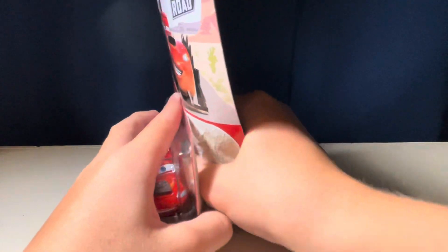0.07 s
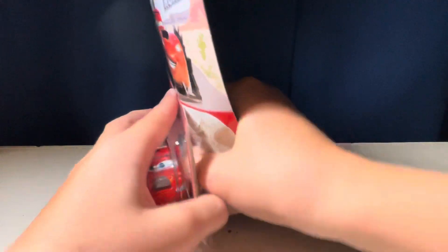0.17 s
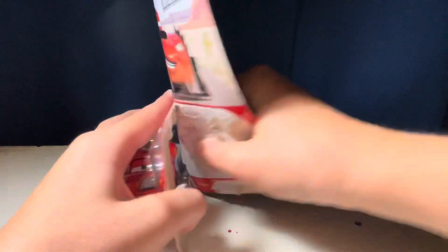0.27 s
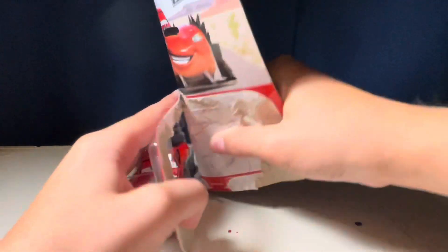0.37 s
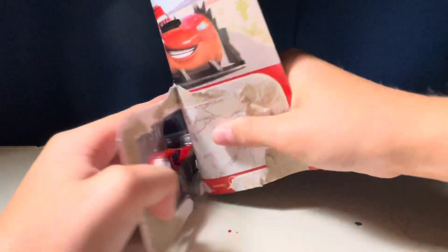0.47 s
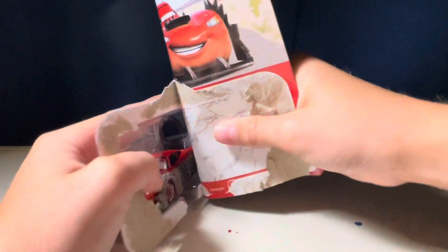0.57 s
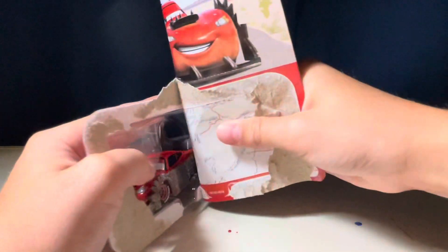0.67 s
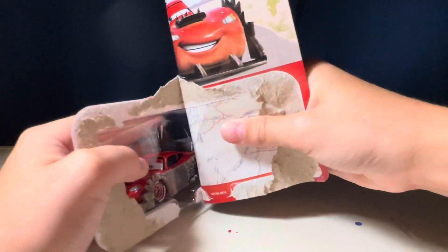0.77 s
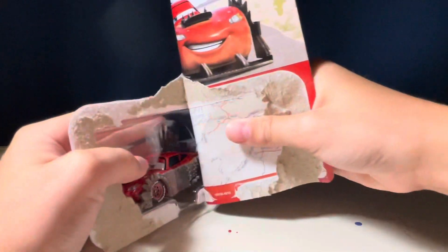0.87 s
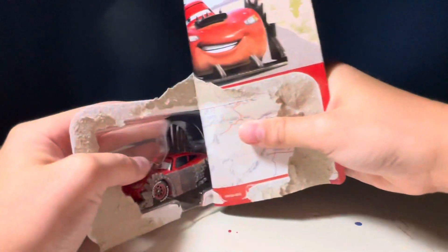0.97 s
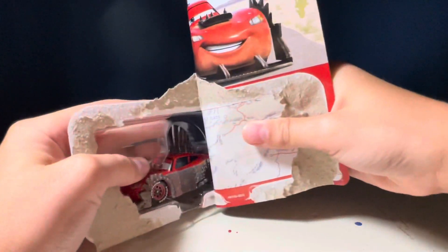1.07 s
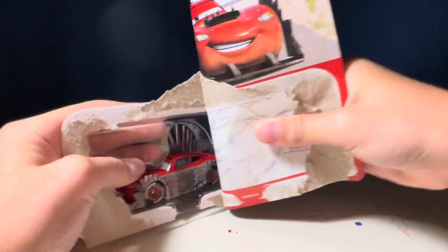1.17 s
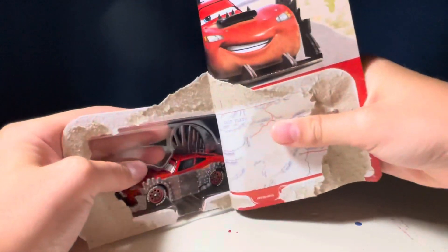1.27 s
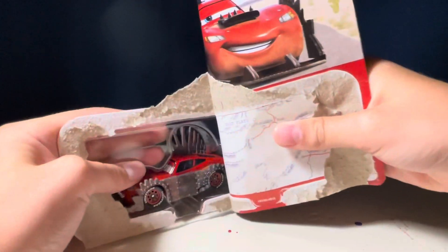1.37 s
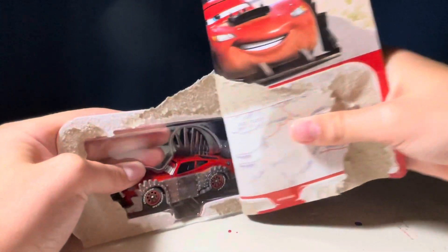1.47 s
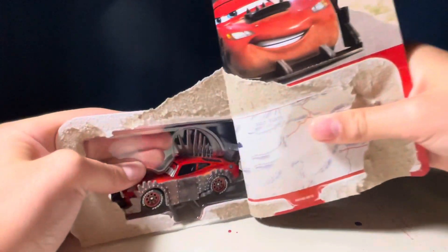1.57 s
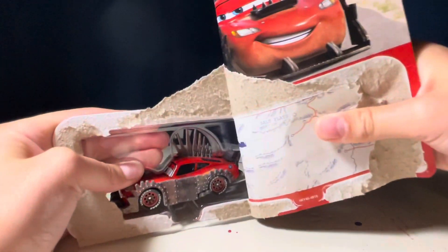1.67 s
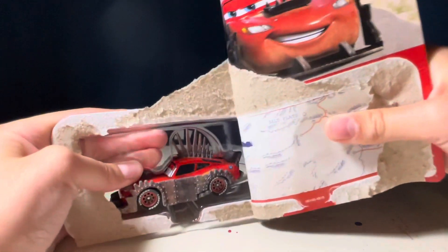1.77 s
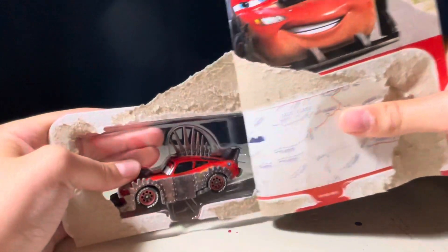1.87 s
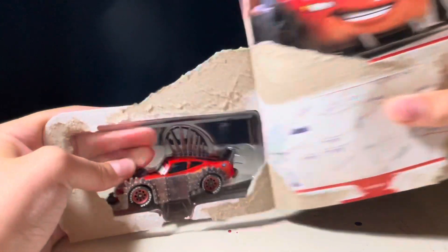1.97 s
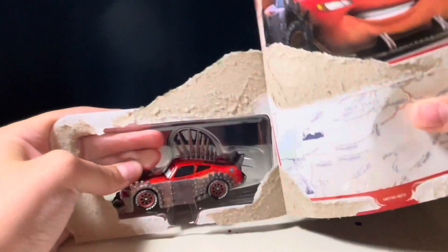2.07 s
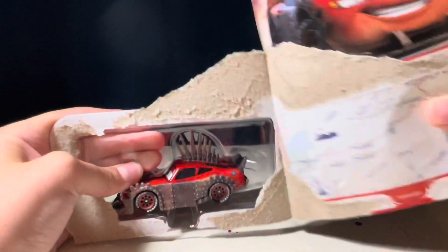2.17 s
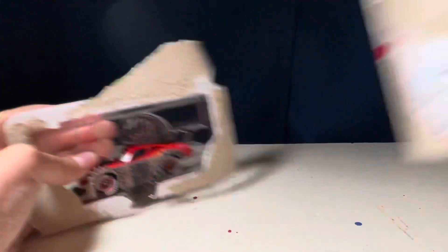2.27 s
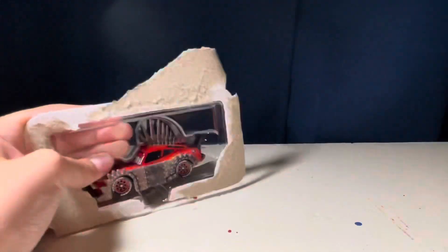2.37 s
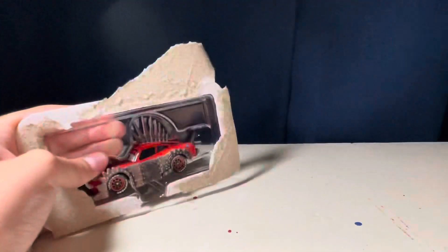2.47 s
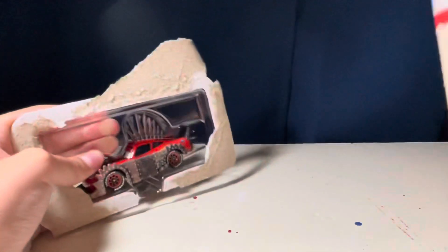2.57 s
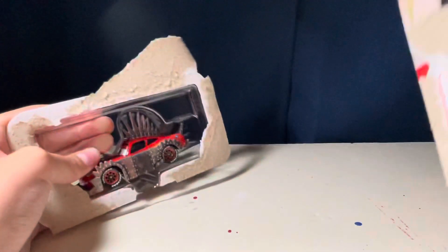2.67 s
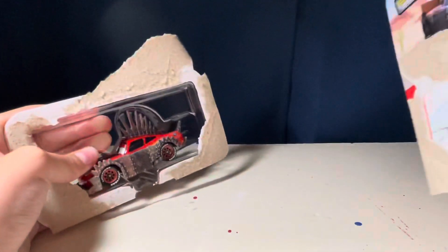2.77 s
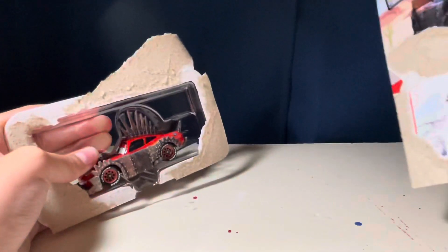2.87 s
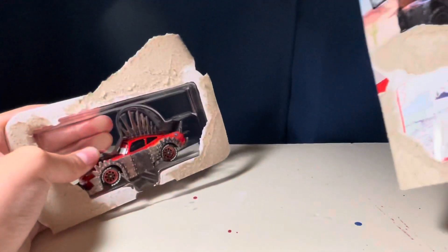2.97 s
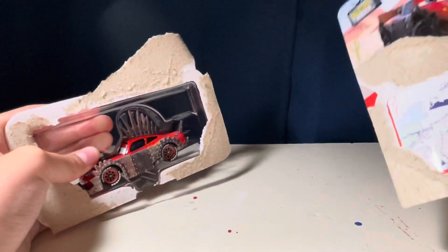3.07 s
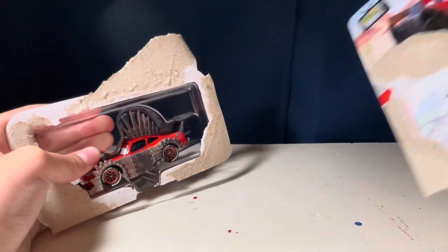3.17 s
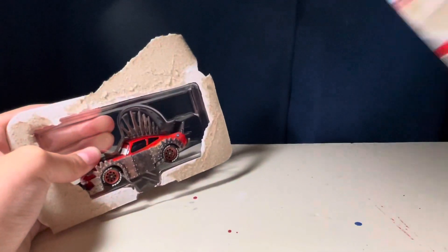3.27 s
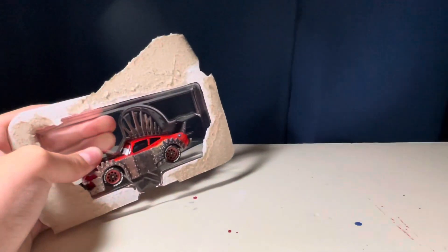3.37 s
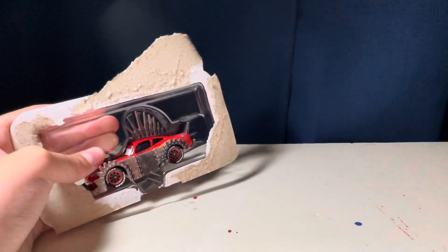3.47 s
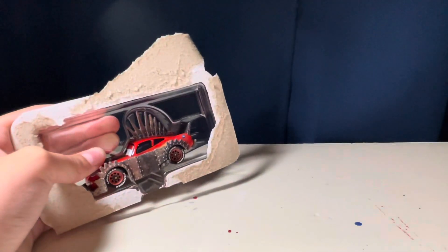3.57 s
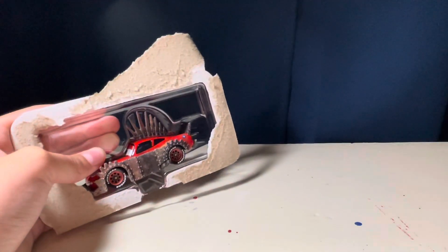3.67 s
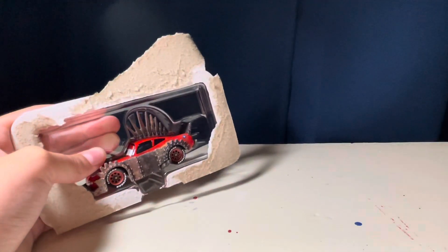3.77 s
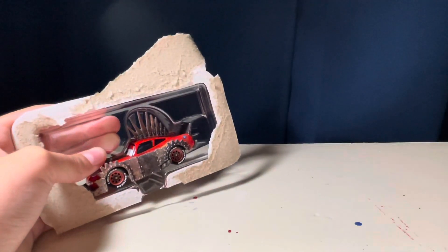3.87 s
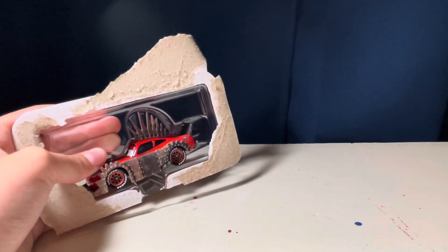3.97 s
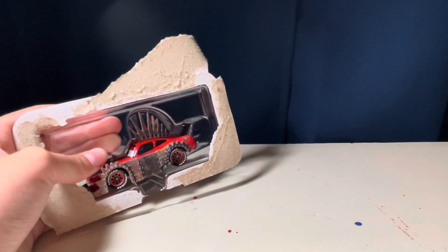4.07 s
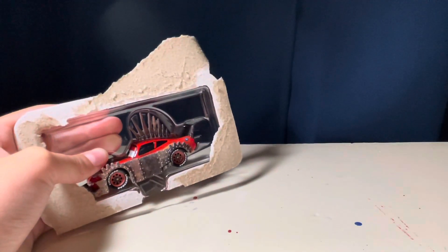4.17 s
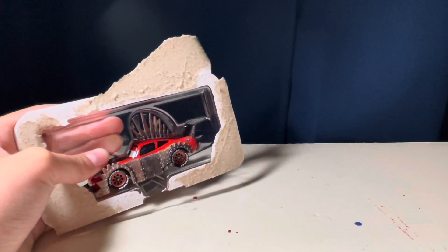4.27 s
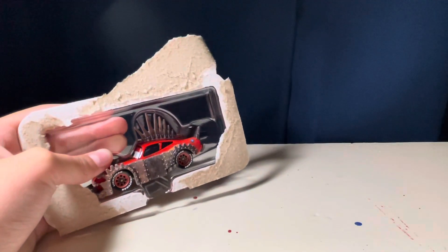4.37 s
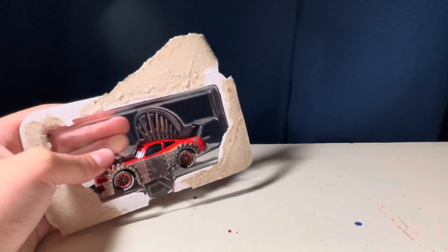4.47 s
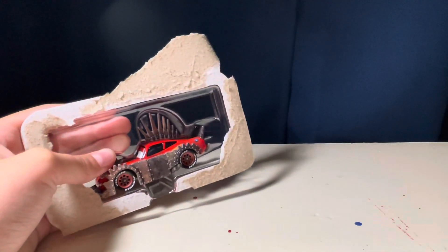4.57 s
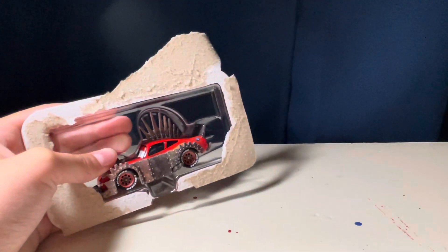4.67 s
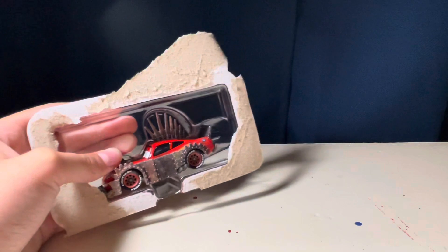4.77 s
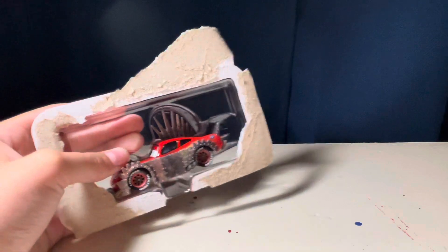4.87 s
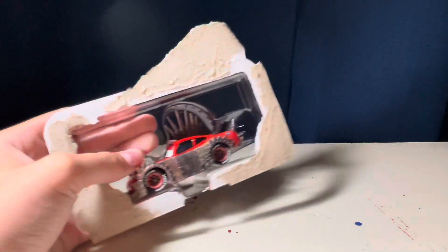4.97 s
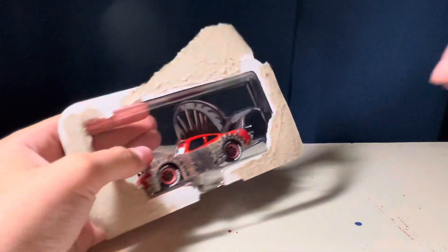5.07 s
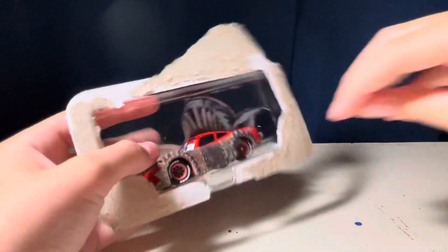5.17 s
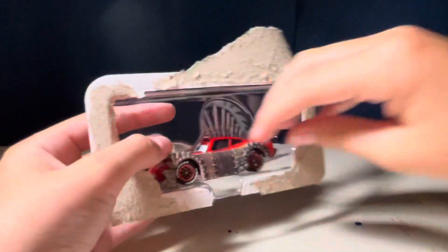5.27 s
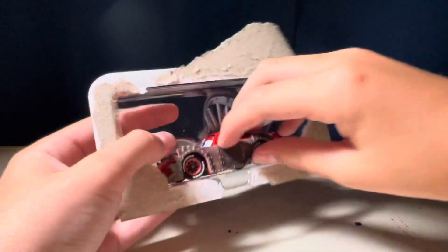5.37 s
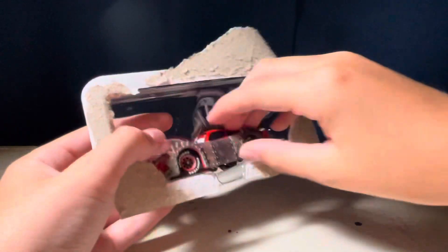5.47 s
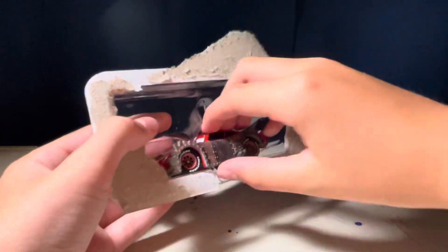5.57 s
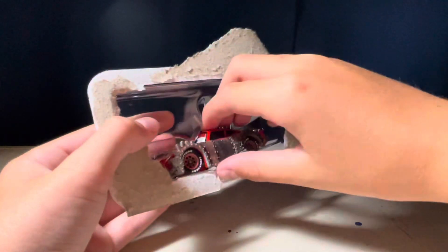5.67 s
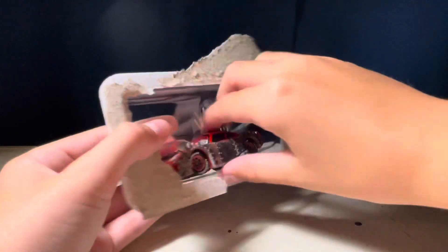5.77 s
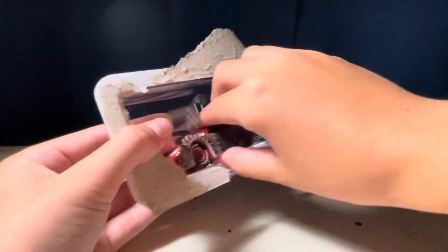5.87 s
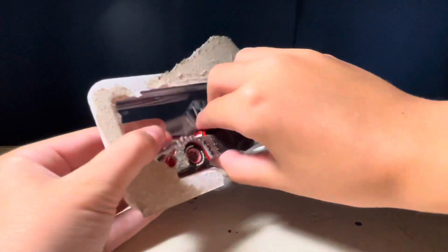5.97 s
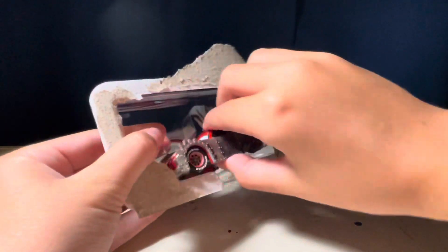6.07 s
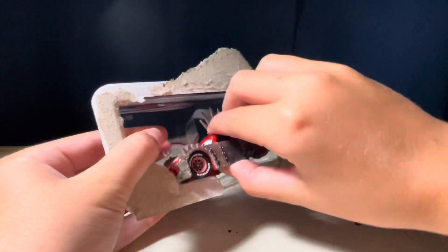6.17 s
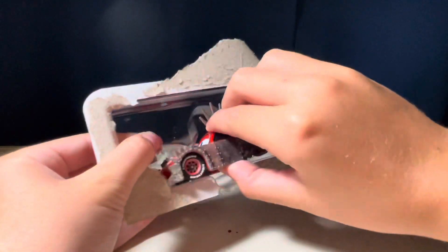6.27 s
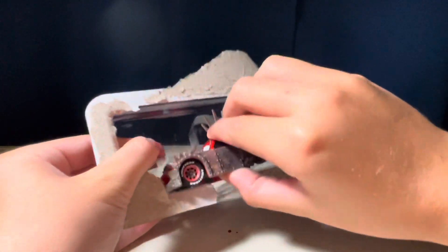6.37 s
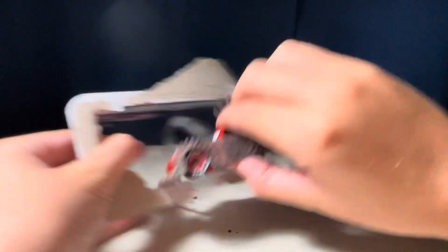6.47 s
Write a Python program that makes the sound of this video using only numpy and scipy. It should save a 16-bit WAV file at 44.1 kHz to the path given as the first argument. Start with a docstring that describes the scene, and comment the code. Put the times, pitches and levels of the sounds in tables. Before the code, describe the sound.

Close to a phone in a small room, hands peel cardboard from a plastic blister pack. Fibres snap in a dense, drumming tear with sharp jerks, juddering and a loud thump as it rips free. The loose card rustles faintly away to the right and taps the table. After a pause, fingers rub and crinkle the shell, which pops, creaks and finally cracks and squeaks as the toy is pulled. Faint air and hum behind.

```python
"""A table in a small room: hands peel the cardboard back off a toy's blister pack, close to a phone.
Fibres snap in a dense stream of noise grains that drums on the card until it rips free.
The card slides aside to the right; fingers rub and crinkle the plastic shell with filtered grains,
short bursts and ringing modes, and it pops and squeaks as the toy is pulled out. Faint air and hum lie behind."""
import sys
import numpy as np
from scipy import signal
from scipy.fft import rfft, irfft, next_fast_len
from scipy.io import wavfile
from scipy.ndimage import uniform_filter1d

SR = 44100
rng = np.random.default_rng(int(sys.argv[2]) if len(sys.argv) > 2 else 0)


def materialize(psi):
    """Save the field psi as 16-bit PCM at rate SR to the path in sys.argv[1].

    A 1-D psi becomes a single channel; in a 2-D psi each row is a channel.
    """
    bounded = np.clip(np.atleast_2d(psi).T, -1, 1)
    quanta = np.round(bounded * 32767).astype(np.int16)
    wavfile.write(sys.argv[1], SR, quanta)


N = 287961
T = np.arange(N) / SR
PADDED = next_fast_len(N + 4096, True)  # room for filtering the whole scene at once
HZ = np.fft.rfftfreq(PADDED, 1 / SR)

# tone colour of fibres fizzing at the tear: frequency_hz, gain_db
FIBRE_COLOUR = [(1200, -11), (3200, 0.5), (4500, -2.5), (6500, -2), (8000, -8), (9500, -0.5), (12500, -1.5),
                (14500, -10.5), (16000, -26.5)]
# tone colour of a single strand knocking the flap: frequency_hz, gain_db
STRAND_COLOUR = [(150, -14), (500, -5), (900, 1.5), (1400, -4.5), (2200, -20), (4000, -24)]
# tone colour of a crease in the card giving way: frequency_hz, gain_db
CREASE_COLOUR = [(200, -0.5), (720, -5), (1050, 2.5), (2100, 4), (2550, -7), (3100, -2.5), (5000, -11),
                 (16000, -28)]
# tone colour of rubbing and scraping on the shell: frequency_hz, gain_db
SCRAPE_COLOUR = [(200, -21.5), (450, -0.5), (620, -8), (850, -2.5), (1100, -6.5), (1500, 1), (2300, -11),
                 (3200, -4), (4800, -14.5), (6200, -12.5), (9000, -23), (12500, -15), (16000, -44.5)]
# bright hiss of sliding skin or card: frequency_hz, gain_db
HISS_COLOUR = [(1800, -5.5), (3000, -3), (9000, -12), (12500, -10), (14500, -36)]


def undb(db):
    """Turn decibels into a gain."""
    return 10 ** (np.asarray(db) / 20)


def unit(x):
    """Scale to rms 1."""
    return x / np.sqrt(np.mean(x ** 2))


def unit_peak(x, size=176):
    """Scale so that the loudest 4 ms (176 samples) have rms 1."""
    return x / np.sqrt(uniform_filter1d(x ** 2, size, axis=-1).max())


def colour(x, points, size=2048):
    """Filter to a given spectrum without smearing sound ahead of each event (minimum phase)."""
    hz, db = np.transpose(points)
    f = np.maximum(np.fft.rfftfreq(size, 1 / SR), 1)
    cepstrum = irfft(np.log(undb(np.interp(np.log(f), np.log(hz), db))))
    # folding the cepstrum forward makes the filter causal
    cepstrum[1:size // 2] *= 2
    cepstrum[size // 2 + 1:] = 0
    response = irfft(np.exp(rfft(cepstrum)))
    return signal.fftconvolve(x, response[None], axes=-1)[:, :x.shape[1]]


def fade(t60, length):
    """Exponential decay that falls 60 dB in t60 seconds."""
    return np.exp(-np.log(1000) * np.arange(int(length * SR)) / SR / t60)


def ring(hz, t60):
    """One struck mode: a sine that dies away."""
    decay = fade(t60, .5)
    return decay * np.sin(2 * np.pi * hz * np.arange(len(decay)) / SR)


def ports(x, left_db, right_early_ms=0):
    """Place a sound between two microphones by level and time; above 8 kHz both hear it alike."""
    reach = np.interp(HZ, [6000, 8000], [1, 0])
    lean = undb(left_db * reach / 2)
    lead = np.exp(2j * np.pi * HZ * reach * right_early_ms / 10 ** 3)
    return irfft(rfft(x, PADDED) * [lean, lead / lean], PADDED)[:, :N]


def noise(count, apart):
    """A noise pair; a bending sheet radiates differently to each side in the upper mids."""
    upper_mids = signal.butter(2, [1800, 6000], "band", fs=SR, output="sos")
    own = signal.sosfilt(upper_mids, rng.standard_normal((2, count)))
    shared = rng.standard_normal(count)
    return shared + apart * (2 * own + 0.089 * rng.standard_normal((2, count)))


def add(out, s, x):
    """Mix x into out at time s."""
    i = max(int(s * SR), 0)
    out[:, i:i + x.shape[1]] += x[:, :max(N - i, 0)]


def grains(rate, spread_db, apart, count=N):
    """Tiny fractures at random moments, rate per second, a few much larger than the rest."""
    size = undb(spread_db * np.minimum(rng.exponential(size=count), 4))
    return noise(count, apart) * size * (rng.random(count) < rate / SR)


def flicker(rate, depth_db):
    """A gain that wanders between random values, rate of them per second."""
    knots = rng.standard_normal(int(N / SR * rate) + 2)
    return undb(depth_db * np.interp(T * rate, np.arange(len(knots)), knots))


def effort(s, length, start_db, end_db):
    """Gain of one move of the hand: it grips, holds while the force drifts, and slackens."""
    grip_db_per_s, slack_db_per_s = 471, 417.5
    held = np.interp(T, [s, s + length], [start_db, end_db])
    before, after = np.maximum(s - T, 0), np.maximum(T - s - length, 0)
    return undb(held - grip_db_per_s * before - slack_db_per_s * after)


def crack(points, t60, tail_t60, tail_db):
    """A sharp noise burst followed by a fainter shiver of the sheet."""
    rise_s = 0.00088  # time a crack takes to run across the sheet
    burst = noise(int(.1 * SR), 0.54) * (fade(t60, .1) + undb(tail_db) * fade(tail_t60, .1))
    opening = np.minimum(T[:burst.shape[1]] / rise_s, 1)
    return unit_peak(colour(burst * opening, points))


def stroke(length, points):
    """A run of tiny slips that swells and dies away."""
    count = int(length * SR)
    slips = unit(colour(grains(rate=4000, spread_db=3, apart=.45, count=count), points))
    return slips * np.sin(np.linspace(0, np.pi, count)) ** 1.5


def drumming(points, bundles):
    """Fibre snaps heard through the card; each frequency band of the flap swells and fades on its own."""
    snaps = colour(grains(rate=2200, spread_db=2.4, apart=.7) * bundles, points)
    edges = [0, 420, 650, 950, 1300, 1900, SR]  # Hz
    spectrum = rfft(snaps, PADDED)
    total = 0
    for lo, hi in zip(edges, edges[1:]):
        band = irfft(spectrum * ((HZ >= lo) & (HZ < hi)), PADDED)[:, :N]
        total = total + band * flicker(rate=45, depth_db=2.2)
    return unit(total)


def peel():
    """Fibres part in bundles; each snap fizzes at the tear and drums on a flap that deepens as it grows."""
    # pulls on the card: start_s, length_s, drumming_start_db, drumming_end_db,
    # then fizz_db and flexing_db relative to the drumming (all before the mix gains below)
    pull_moves = [(.015, 0.3, -58, -46.5, 2, 5), (0.241, .33, -39.5, -36.5, -5, -7.5),
                  (0.589, 0.65, -40.5, -48.5, -5, -7), (1.159, 0.2, -30, -66.5, -2, -6.5),
                  (1.359, 0.057, -52.5, -44.5, -3.5, -25), (1.442, 0.26, -31, -46, -3, -11),
                  (1.707, 0.27, -44, -26, -1.5, -7.5), (2.194, 0.031, -31, -31.5, 0.5, -2)]
    # thicker bundles letting go in a short rip: start_s, length_s, drumming_db, fizz_db
    short_rips = [(0.123, 0.1, -54, -73), (0.206, 0.043, -36, -31), (0.317, 0.075, -42, -88),
                  (0.434, 0.1, -46, -51), (0.874, 0.11, -41.5, -49), (1.163, 0.031, -26, -55),
                  (1.411, 0.01, -40, -36.5), (2.197, 0.019, -16.5, -22), (2.22, 0.034, -18.5, -23.5),
                  (6.456, 0.14, -38.5, -54)]
    # tone colour of the freed flap, stiff while short: frequency_hz, gain_db
    short_flap = [(200, -19.5), (380, -5), (680, 1), (1340, 2.5), (1680, -7), (4000, -33.5)]
    # tone colour of the flap once long: frequency_hz, gain_db
    long_flap = [(200, -9), (330, -11.5), (500, 0), (720, -6), (960, -0.5), (1200, -10), (1500, -4),
                 (2000, -11), (4000, -37.5)]
    # tone colour of the card bending: frequency_hz, gain_db
    flex_colour = [(40, -18.5), (90, 0.5), (160, -24), (230, 4.5), (330, -5.5), (600, -48)]
    pulls = np.array([effort(*row[:4]) for row in pull_moves])
    fizz_offset, flex_offset = np.array(pull_moves)[:, 4:].T
    # the strongest pull at each moment sets the level
    drum, fizz, flex = ((pulls.T * undb(db)).max(axis=1) for db in (0, fizz_offset, flex_offset))
    for s, length, drum_db, fizz_db in short_rips:
        swell = np.interp(T, [s, s + length / 2, s + length], [0, 1, 0])
        drum = drum + swell * undb(drum_db)
        fizz = fizz + swell * undb(fizz_db)
    bundles = flicker(rate=110, depth_db=1.7) * flicker(rate=26, depth_db=1.1)
    freed = np.interp(T, [.9, 1.5], [0, 1])  # the flap goes from short to long
    short = np.sqrt(1 - freed) * drumming(short_flap, bundles)
    card = short + np.sqrt(freed) * drumming(long_flap, bundles)
    fibres = unit(colour(grains(rate=9000, spread_db=2.7, apart=.55) * bundles, FIBRE_COLOUR))
    bending = unit(colour(grains(rate=900, spread_db=1.5, apart=.2), flex_colour))
    drummed = ports(card * drum, 8) * undb(-2.5)
    fizzed = ports(fibres * fizz, 7.2) * undb(1.5)
    return drummed + fizzed + ports(bending * flex, 5.3) * undb(-2.5)


def strands():
    """Tougher strands hold out, then snap alone above the stream of the tear: a knock and a fizz each."""
    # single snapping strands: start_s, knock_db, fizz_db
    strand_snaps = [(.292, -31.5, -48), (0.3694, -48, -30), (.378, -28, -51), (.408, -33, -35),
                    (.494, -34, -34), (0.7213, -39.5, -28.5), (.761, -31, -44), (.816, -34.5, -44),
                    (.94, -49, -32), (1.735, -32, -40)]
    knocks, fizzes = np.zeros((2, 2, N))
    for s, knock_db, fizz_db in strand_snaps:
        knock = crack(STRAND_COLOUR, t60=0.011, tail_t60=0.081, tail_db=-14)
        fizz = crack(FIBRE_COLOUR, t60=0.0078, tail_t60=0.049, tail_db=-19)
        add(knocks, s, knock * undb(knock_db))
        add(fizzes, s, fizz * undb(fizz_db))
    return ports(knocks, 4) + ports(fizzes, 2.3)


def bending_wave(travel_s, size=4096):
    """A kick spreads through the sheet; highs outrun lows, so it arrives as a fast falling chirp."""
    # tone colour of the whipping sheet: frequency_hz, gain_db
    whip_colour = [(60, -17), (140, -1), (240, 2.5), (520, -10), (880, 5), (1200, -9), (1650, 1),
                   (3600, -5.5), (5000, -18.5), (16000, -18.5)]
    f = np.fft.rfftfreq(size, 1 / SR)
    lag = 4 * np.pi * travel_s * np.sqrt(10 ** 3 * f)  # radians; 1 kHz arrives after travel_s
    return unit_peak(colour(irfft(np.exp(-1j * lag))[None], whip_colour))


def whips(return_db=-12, rough_db=-11):
    """The sheet jerks free: a bending wave, a crunch at the break, and a weaker return from the edge."""
    # jerks of the whole sheet: start_s, level_db, travel_s of the 1 kHz bending wave
    sheet_jerks = [(0.2253, -9.5, .005), (2.2026, -14.5, .011), (6.4374, -14, .0036), (6.4455, -26, .004)]
    out = np.zeros((2, N))
    for s, db, travel_s in sheet_jerks:
        add(out, s, bending_wave(travel_s) * undb(db))
        add(out, s, bending_wave(2 * travel_s) * undb(db + return_db))
        crunch = crack(CREASE_COLOUR, t60=0.03, tail_t60=.09, tail_db=-16.5)
        add(out, s + travel_s / 2, crunch * undb(db + rough_db))
    return ports(out, 7.0)


def swing(hz, t60):
    """A panel's lowest mode, brought up over one cycle by a soft push."""
    wave = ring(hz, t60)
    return (wave * np.minimum(T[:len(wave)] * hz, 1))[None]


def bumps():
    """Whole panels spring back and swing at their lowest mode, once or in an uneven, rasping judder."""
    # soft bumps of the pack, card and toy: start_s, pitch_hz, t60_s, level_db
    soft_bumps = [(0.229, 193, 0.022, -23), (2.21, 133, 0.022, 2.5), (2.226, 86, 0.12, -10.5),
                  (2.249, 99, 0.046, -5.5), (2.351, 234, 0.051, -24.5), (4.004, 103.2, 0.063, -35),
                  (4.196, 97, 0.14, -38), (4.798, 205.4, .09, -35.5), (4.818, 263, 0.11, -37.5),
                  (6.444, 74.4, .12, -25.5), (6.44, 251, 0.1, -5.5), (6.487, 344, 0.061, -15.5),
                  (6.5, 248, 0.163, -21.5), (6.51, 435, 0.18, -22.5)]
    # a bent panel catches and slips in the hand: start_s, level_db
    judder_slips = [(.158, -30.5), (0.177, -33), (1.677, -24), (1.694, -27.5), (1.726, -24.5), (1.758, -23),
                    (1.78, -22), (1.795, -20.5), (1.816, -24), (1.843, -26)]
    judder_hz, judder_t60_s = 238, .065
    rasp_db = -16  # fibres that give at each slip, relative to the swing's level
    out = np.zeros((2, N))
    for s, hz, t60, db in soft_bumps:
        add(out, s, swing(hz, t60) * undb(db))
    for s, db in judder_slips:
        bend = np.exp(.04 * rng.standard_normal())  # each slip is slightly detuned
        rasp = crack(STRAND_COLOUR, t60=.03, tail_t60=.06, tail_db=-18)
        add(out, s, swing(judder_hz * bend, judder_t60_s) * undb(db))
        add(out, s, rasp * undb(db + rasp_db))
    return ports(out, 6.1)


def slides():
    """The torn card is carried off to the right and slid onto the table: swelling runs of tiny slips."""
    # swishes of the loose card: start_s, length_s, rustle_db, hiss_db
    card_slides = [(2.268, 0.35, -58, -74), (2.549, 0.17, -58.5, -63.5), (2.879, 0.28, -59.5, -72.5),
                   (3.2, 0.19, -55.5, -54.5), (3.371, .14, -72, -68), (3.895, 0.25, -49.5, -63),
                   (3.992, 0.068, -45, -58), (4.086, 0.26, -48, -85)]
    # tone colour of the rustle: frequency_hz, gain_db
    rustle_colour = [(100, 12.5), (400, 8.5), (900, 6.5), (4400, -5), (11000, -23.5), (16000, -31.5)]
    out = np.zeros((2, N))
    for s, length, rustle_db, hiss_db in card_slides:
        rustle = stroke(length, rustle_colour) * undb(rustle_db)
        add(out, s, rustle + stroke(length, HISS_COLOUR) * undb(hiss_db))
    return ports(out, -1.0, right_early_ms=.5)


def ticks():
    """Creases of the card give way and its edge taps the table, off to the right, as short bursts."""
    # dry ticks of the card: start_s, level_db
    card_ticks = [(1.412, -41), (2.4554, -46.5), (2.6225, -42.5), (3.898, -34), (3.906, -38.5),
                  (4.0113, -38), (4.025, -43), (4.124, -40), (4.1958, -22.5), (4.207, -37), (4.2425, -35.5)]
    out = np.zeros((2, N))
    for s, db in card_ticks:
        add(out, s, crack(CREASE_COLOUR, t60=.014, tail_t60=0.095, tail_db=-15.5) * undb(db))
    return ports(out, -0.86, right_early_ms=0.497)


def rubbing():
    """Skin slides over the plastic: a soft rustle of small slips with hiss on top."""
    # fingers sliding on the shell: start_s, length_s, start_level_db, end_level_db
    finger_rubs = [(4.837, 0.327, -69, -59), (5.133, 0.53, -69.5, -61), (5.473, 0.18, -54.5, -56.5),
                   (5.729, 0.38, -62, -53), (6.227, 0.22, -52.5, -69.5)]
    hiss_db = -2  # hiss relative to the rustle
    rub = np.max([effort(*row) for row in finger_rubs], axis=0)
    grip = flicker(rate=60, depth_db=2)
    body = unit(colour(grains(rate=900, spread_db=3.5, apart=.4) * grip, SCRAPE_COLOUR))
    top = unit(colour(grains(rate=4000, spread_db=3.4, apart=.4) * grip, HISS_COLOUR))
    return ports(body * rub, 4.7) + ports(top * rub, 5.7) * undb(hiss_db)


def scrapes():
    """The toy and fingernails drag over the shell in short runs of slips."""
    # short scrapes: start_s, length_s, level_db
    shell_scrapes = [(5.53, 0.065, -38.5), (5.722, 0.092, -49), (5.785, 0.036, -45), (5.853, 0.033, -39.5),
                     (6.217, 0.031, -43.5), (6.408, 0.082, -38), (6.443, 0.014, -16), (6.448, 0.081, -32)]
    out = np.zeros((2, N))
    for s, length, db in shell_scrapes:
        add(out, s, stroke(length, SCRAPE_COLOUR) * undb(db))
    return ports(out, 4.6)


def wall_ring():
    """The shell wall's modes, detuned by each new bend and shared unevenly left and right; lows come last."""
    # modes of the shell wall: pitch_hz before detuning, level_db
    wall_modes = [(620, -8.5), (850, -5), (1100, -9.5), (1380, 3), (1630, 0.5), (1920, 0), (2400, -6.5),
                  (3250, -1.5), (4200, -8.5)]
    cycles = 32  # roughly how many cycles a mode rings before it is 60 dB down
    delay_s = .0015  # travel time of a 1 kHz bending wave; lower ones are slower
    bend = np.exp(.08 * rng.standard_normal(len(wall_modes)))
    shares = 1 + 0.6 * rng.standard_normal((2, len(wall_modes), 1))
    modes = []
    for (hz, db), b in zip(wall_modes, bend):
        late = int(delay_s * SR * np.sqrt(10 ** 3 / hz))
        mode = np.roll(ring(hz * b, cycles / hz), late)
        modes.append(undb(db) * mode * rng.choice([-1, 1]))
    return unit_peak((shares * np.array(modes)).sum(axis=1))


def buckles(crack_db=-6, wall_db=3, knock_db=0, knock_hz=240, knock_t60=0.013, settle_db=-6):
    """A dent flips and settles: a crack, the wall's ring and, a little later, a hollow knock."""
    # buckling of the shell: start_s, level_db, hollowness_db (a broad dent knocks more, cracks less)
    shell_buckles = [(0.045, -39.5, -0.5), (1.1454, -30.5, -19), (1.1646, -29, -6), (2.1733, -37, -6),
                     (2.2103, -22.5, -1.5), (2.245, -28, 5), (2.283, -31, -4.5), (2.2984, -28.5, 3),
                     (2.3461, -33.5, 3.5), (2.379, -42, 0.5), (5.013, -35.5, -10), (5.0711, -36.5, -7),
                     (5.087, -39.5, 3), (5.3233, -34, 1.5), (5.401, -40, 2.5), (5.4351, -47.5, 5.5),
                     (5.552, -39.5, 0), (5.5672, -38, 5), (5.799, -40.5, 3), (5.861, -46.5, -10),
                     (6.0358, -35.5, -38), (6.212, -35.5, 6), (6.427, -48, -10)]
    # thin, bright snaps of the plastic: start_s, level_db
    plastic_snaps = [(0.2155, -32), (1.1455, -27), (2.582, -48.5), (3.0938, -44), (5.37, -42.5),
                     (6.059, -41), (6.4455, -20.5)]
    # tone colour of the crack: frequency_hz, gain_db
    crack_colour = [(1000, -23), (2400, 3), (4900, 0), (10000, -3.5), (12500, -8), (16000, -17)]
    # tone colour of the thin snap: frequency_hz, gain_db
    snap_colour = [(1500, -8.5), (4200, 13.5), (5500, 5.5), (7000, -13.5), (12000, -3.5), (16000, -18.5)]
    crack_loss = 0.18  # dB of crack lost per dB of hollowness
    out = np.zeros((2, N))
    for s, level, hollowness in shell_buckles:
        sharp = level - crack_loss * hollowness
        settle_s = s + rng.uniform(.002, .008)
        for at, db in [(s, 0), (settle_s, settle_db)]:
            burst = crack(crack_colour, t60=0.023, tail_t60=0.15, tail_db=-18.0)
            add(out, at, burst * undb(sharp + crack_db + db))
        add(out, s, wall_ring() * undb(level + wall_db))
        bend = np.exp(0.085 * rng.standard_normal(2))
        hollow = ring(knock_hz * bend[0], knock_t60) + ring(410 * bend[1], 0.02)
        add(out, s + .003, unit_peak(hollow[None]) * undb(level + hollowness + knock_db))
    for s, db in plastic_snaps:
        add(out, s, crack(snap_colour, t60=0.0062, tail_t60=0.026, tail_db=-10) * undb(db))
    return ports(out, 6.8)


def creaks(cycles=13):
    """The toy catches and slips on the shell, ever faster; each slip plucks the wall: a short, woody tock."""
    # slips of the toy: start_s, level_db
    toy_slips = [(5.903, -35), (5.9252, -32.5), (5.9346, -34.5), (5.941, -31.5), (5.946, -38)]
    # modes of the wall under a damping finger: pitch_hz before detuning, level_db
    pinched_modes = [(870, -2), (1330, 0), (1600, 0.5), (2320, -5), (3100, -9)]
    out = np.zeros((2, N))
    for s, db in toy_slips:
        bend = np.exp(.04 * rng.standard_normal(len(pinched_modes)))
        tock = 0
        for k, (hz, mode_db) in enumerate(pinched_modes):
            tock = tock + (-1) ** k * undb(mode_db) * ring(hz * bend[k], cycles / hz)
        add(out, s, unit_peak(tock[None]) * undb(db))
    return ports(out, 7.4)


def wavering_note(hz, waver_db):
    """A sine whose pitch and level both waver; 1 dB of waver shifts the pitch by about 12 percent."""
    phase = 2 * np.pi * np.cumsum(hz * flicker(rate=600, depth_db=waver_db)) / SR
    return np.sin(phase) * flicker(rate=300, depth_db=3)


def squeak(lower_db=4):
    """The toy rubs a thin rising note out of the plastic as it gathers speed; a rougher, lower one joins."""
    span = [6.467, 6.527]  # start and end, s
    hz = np.interp(T, span, [2800, 3520])
    swell = np.sqrt(np.abs(np.sin(np.interp(T, span, [0, np.pi]))))
    both = wavering_note(hz, .15) + wavering_note(.55 * hz, .5) * undb(lower_db)
    return ports(both * swell * undb(-36.5), 4.9)


def resonate(x, modes, direct_db):
    """Pass a sound through a sheet: part comes straight off it, part rings on in its resonances."""
    total = undb(direct_db) * x
    for hz, width_hz, db in modes:
        b, a = signal.iirpeak(hz, hz / width_hz, fs=SR)
        total = total + undb(db) * signal.lfilter(b, a, x)
    return total


def scatter(x):
    """A crumpled sheet radiates unevenly: turn the phase at random along the spectrum, apart for each side."""
    # how far the phase strays: frequency_hz, spread_radians
    phase_spread = [(600, 0.12), (1500, 0.59), (5500, 1.0), (7500, 0.062), (12000, 0.2)]
    place = HZ / 380  # a new random turn every 380 Hz
    knots = rng.standard_normal((2, int(place[-1]) + 2))
    turn = np.array([np.interp(place, np.arange(len(k)), k) for k in knots])
    turn = turn * np.interp(HZ, *np.transpose(phase_spread))
    return irfft(rfft(x, PADDED) * np.exp(1j * turn), PADDED)[:, :N]


def room(x, t60=0.12, wet_db=-14):
    """Table and near walls return a short diffuse tail: decaying noise that builds up softly."""
    tail = rng.standard_normal((2, int(.5 * SR))) * fade(t60, .5) * (1 - fade(0.036, .5))
    tail /= np.sqrt(np.sum(tail ** 2, axis=1, keepdims=True))
    return undb(wet_db) * signal.fftconvolve(x, tail, axes=-1)[:, :N]


def background(air_db=-55.5, hum_db=-68):
    """Quiet ventilation noise, most alike on both sides in the bass, with a faint, wavering mains hum."""
    # tone colour of the air: frequency_hz, gain_db
    air_colour = [(25, -17.5), (50, 3), (85, -13), (125, -3.5), (180, -15.5), (260, -9), (400, -20),
                  (900, -23), (2100, -26.5), (3200, -36), (6000, -47), (15000, -59.5)]
    low = signal.butter(2, 450, "low", fs=SR, output="sos")
    high = signal.butter(2, 450, "high", fs=SR, output="sos")
    shared_bass = signal.sosfilt(low, rng.standard_normal(N))
    own_treble = signal.sosfilt(high, rng.standard_normal((2, N)))
    draught = shared_bass + own_treble + 0.27 * rng.standard_normal((2, N))
    air = unit(colour(draught, air_colour, size=8192)) * undb(air_db)
    hum = unit(np.sin(2 * np.pi * 120 * T) * flicker(rate=9, depth_db=4))
    return ports(air + hum * undb(hum_db), 2.9)


def scene():
    """All the handling, in its room: sheets color the sliding and the ticks by their resonances."""
    # the rubbed shell sings along: pitch_hz, width_hz, level_db
    shell_body = [(1425, 150, -1)]
    # resonances of the loose card: pitch_hz, width_hz, level_db
    card_modes = [(865, 51, 12.5), (1117, 74, 4.5), (2110, 200, -8), (2900, 94, -2)]
    shell_sliding = resonate(rubbing() + scrapes(), shell_body, direct_db=1)
    sliding = scatter(peel()) + scatter(slides()) + scatter(shell_sliding)
    card_ticking = resonate(ticks(), card_modes, direct_db=-1.5)
    cracking = strands() + whips() + buckles() + creaks() + card_ticking
    pack = sliding + cracking + bumps() + squeak()
    return pack + room(pack) + background()


def record(dry):
    """The phone turns the phase between its channels, sheds deep bass, rounds peaks and cuts the top."""
    # the phone's stereo pair: frequency_hz, left_lead_radians
    phase_lead = [(0, 0), (900, .4), (1500, 1.5), (2500, 3.0), (3500, 3.3), (5200, 2.7), (6200, -.7),
                  (8000, -3.1), (8800, -3.2), (10500, -6.2), (12400, -6.3), (14400, -9.4)]
    turn = np.exp(-1j * np.interp(HZ, *np.transpose(phase_lead)))
    right = irfft(rfft(dry[1], PADDED) * turn, PADDED)[:N]
    bass_cut = signal.butter(3, 45, "high", fs=SR, output="sos")
    lean = signal.sosfilt(bass_cut, np.array([dry[0], right]))
    top_cut = signal.ellip(8, .2, 70, 15900, fs=SR, output="sos")
    return signal.sosfilt(top_cut, np.tanh(lean))


dry = scene()
out = record(dry)
materialize(out)
```